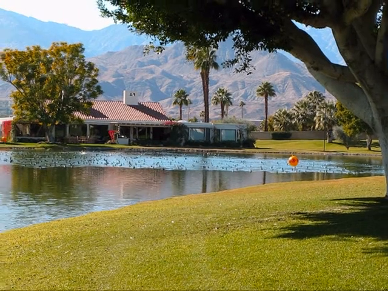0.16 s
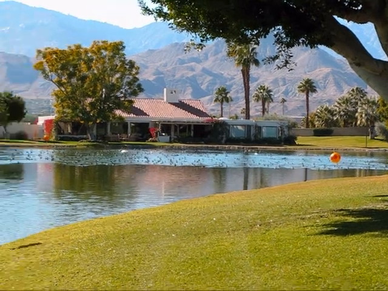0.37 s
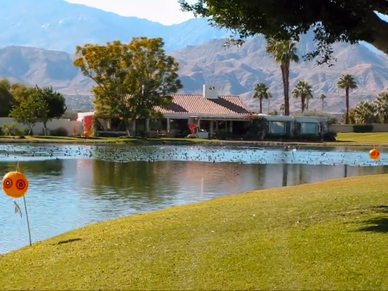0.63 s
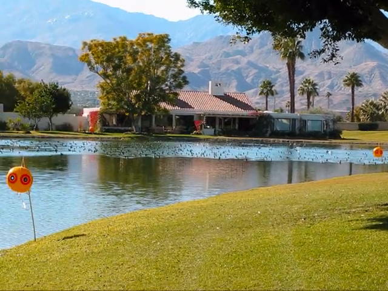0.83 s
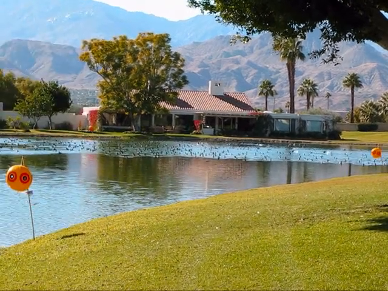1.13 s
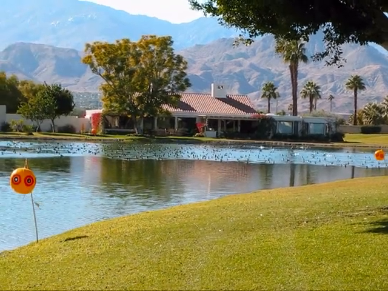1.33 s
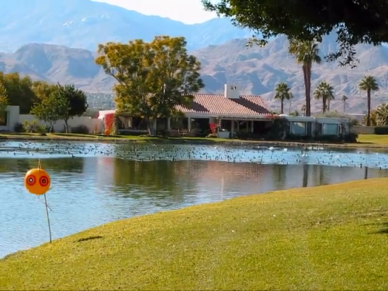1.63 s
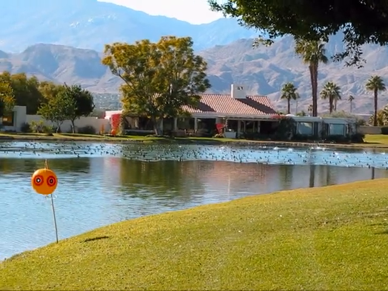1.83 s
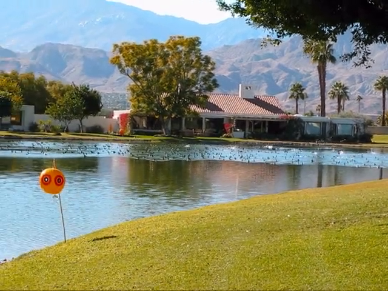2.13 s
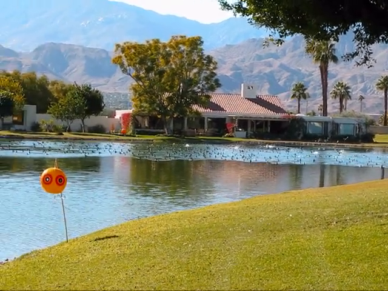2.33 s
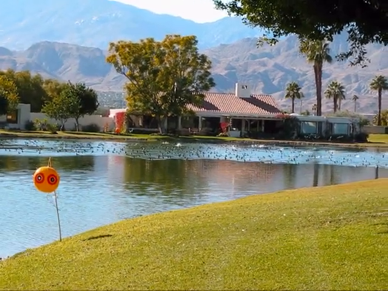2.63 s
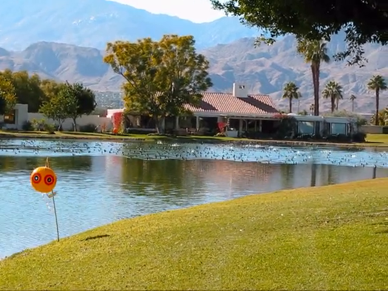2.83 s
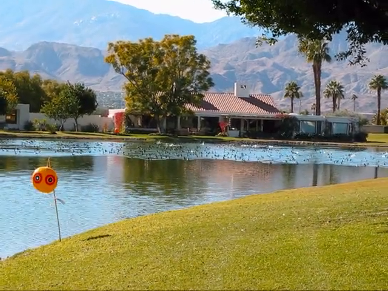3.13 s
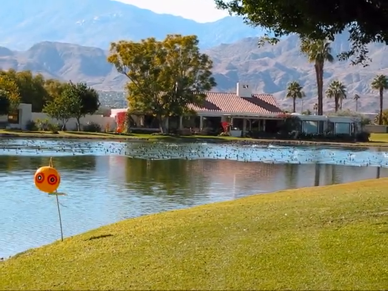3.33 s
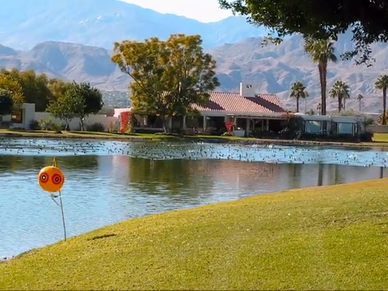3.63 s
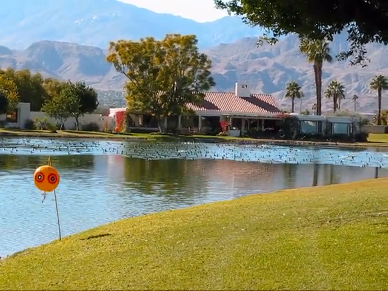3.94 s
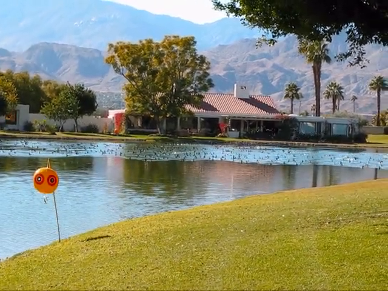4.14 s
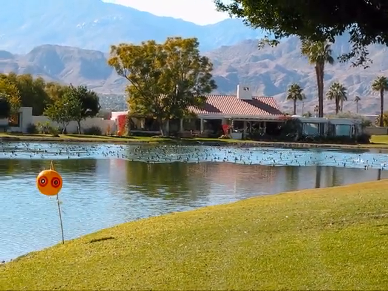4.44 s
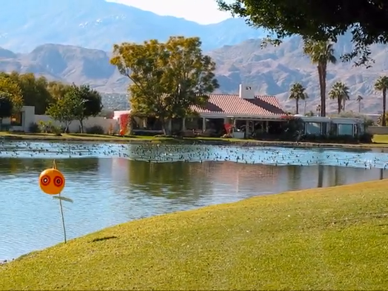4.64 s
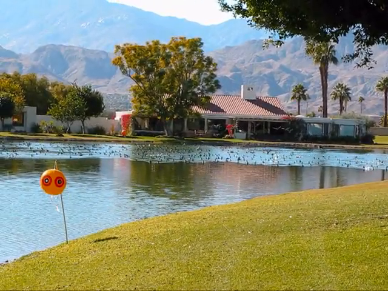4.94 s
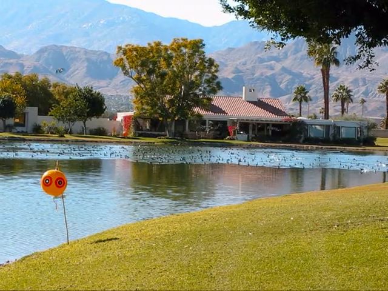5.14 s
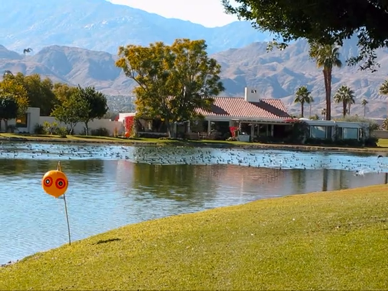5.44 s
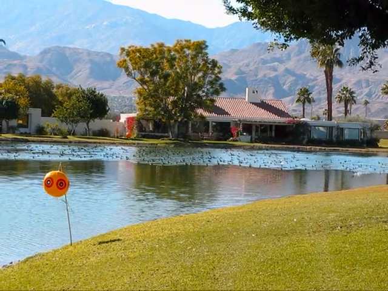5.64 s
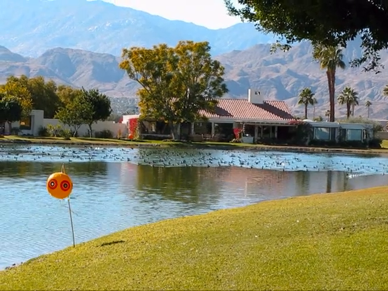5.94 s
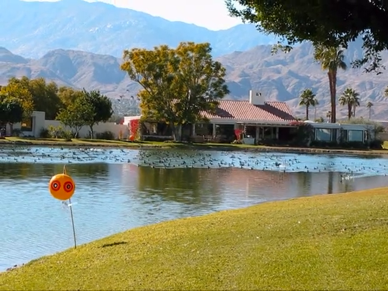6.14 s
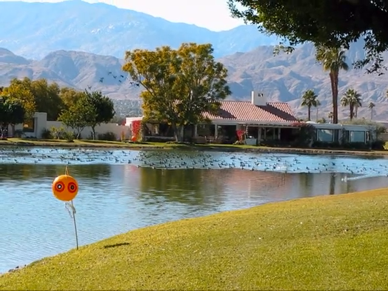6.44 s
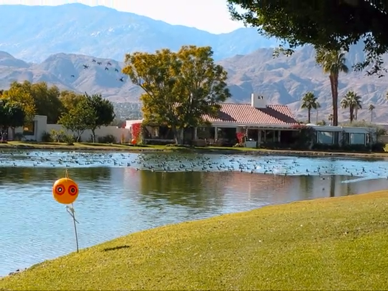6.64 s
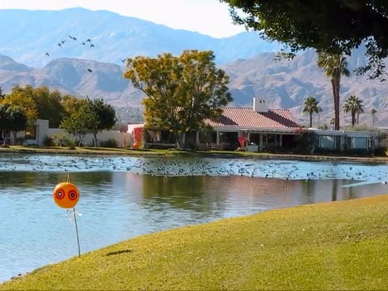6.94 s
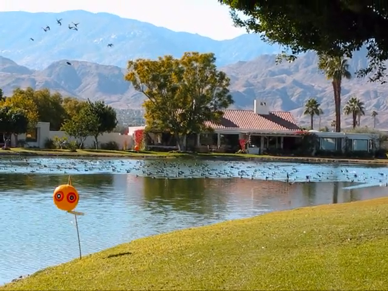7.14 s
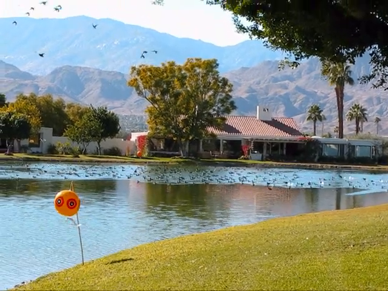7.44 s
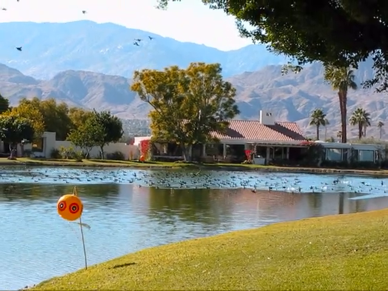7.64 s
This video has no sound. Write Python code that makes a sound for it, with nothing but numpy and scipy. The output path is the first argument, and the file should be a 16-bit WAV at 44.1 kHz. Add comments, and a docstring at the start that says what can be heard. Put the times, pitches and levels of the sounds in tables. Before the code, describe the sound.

Waterbirds rest far out on an open pond. Throughout the roughly eight seconds, their soft chatter, dabbling and tiny splashes mix with steady airy hiss and a distant motor's low, wavering hum. From the start until about 3.3 seconds, birds give a string of short two-toned notes. Hoarse clucks join from about 1.4 seconds, bunching up between 3 and 4 seconds. Light wind rumbles on the microphone from around 2 seconds, with the strongest bumps near 5.2 and 6.5 seconds. Two sharp little water ticks come near 3.8 seconds. From about 3.5 seconds, brief rising and falling whistles and fainter high squeals take over, clearest near 5.1 and 6.6 seconds. A second faint drone swells once between 4 and 5.5 seconds. From about 6.7 seconds to the end, a small bird peeps thinly. The calls carry a slight echo from the banks.

```python
"""Coots and other waterbirds rest far out on a pond. Throughout, chatter, dabbling and small splashes
mix with open-air hiss and a distant motor's hum. First come short two-toned notes, one tone from each
side of the syrinx; hoarse clucks, pulses ringing the throat, join them as light wind starts to bump the
one microphone. From about halfway, arched whistles and faint squeals, shaped by throat resonance, take
over and a second drone swells once. Near the end a small bird peeps thinly."""
import sys
import numpy as np
from scipy import signal
from scipy.fft import rfft, irfft, next_fast_len
from scipy.io import wavfile

SR = 44100
rng = np.random.default_rng(int(sys.argv[2]) if len(sys.argv) > 2 else 0)


def bounce(signal):
    """Save signal as a 16-bit WAV file at the path given by the first command-line argument."""
    frames = np.transpose(np.atleast_2d(signal))
    limited = np.clip(frames, -1, 1)
    pcm = np.round(limited * 32767).astype(np.int16)
    wavfile.write(sys.argv[1], SR, pcm)


N = 343098
TIME = np.arange(N) / SR

# spectra (f/Hz, relative spectral level/dB)
AIR_SPECTRUM = [(59, -26), (100, -3), (124, -3.5), (210, -8), (459, -9), (716, -8), (1380, -11),
                (2240, -13.5), (3730, -18), (9270, -24.5), (14500, -30.5), (15700, -33)]   # steady open air
WIND_SPECTRUM = [(25, -23), (50, -4.5), (90, 2), (150, -1.5), (230, -8), (350, -17), (700, -43),
                 (3000, -100)]   # turbulence at the microphone
CHATTER_SPECTRUM = [(300, -47), (480, 0.5), (650, 5), (900, 1), (1300, -2.5), (2000, -25)]   # low voices of the far flock
DABBLING_SPECTRUM = [(700, -8.5), (1300, -3.5), (1800, -1.5), (2300, -1), (3100, -3), (3900, -11.5),
                     (5000, -14.5), (9000, -45)]   # bills in the water
SPRAY_SPECTRUM = [(3000, 5), (5000, 3.5), (8000, -1), (12000, -7.5), (15800, -25)]   # fine spray
# swing of the motor's hum (t/s, relative level/dB)
HUM_LEVELS = [(0.0, -63), (0.41, -59.5), (0.78, -51.5), (1.99, -48), (2.3, -49.5), (2.93, -57.5),
              (3.58, -58.5), (3.86, -52.5), (4.38, -54), (4.53, -50), (5.87, -60), (6.44, -47.5),
              (6.82, -60), (7.3, -59), (7.78, -50)]
# its overtones at the usual hum level (frequency ratio, level/dB)
HUM_OVERTONES = [(1.48, -64), (2, -64.5), (3, -71.5)]
# gusts of the breeze (t/s, duration/s, relative level/dB)
WIND_GUSTS = [(1.29, .16, -62), (1.98, .13, -56), (2.186, 0.18, -47), (2.59, 0.25, -53), (3.59, 0.26, -46),
              (3.855, 0.5, -49), (4.398, 0.42, -47), (4.75, 0.32, -49.5), (5.15, .18, -43.5),
              (6.18, 0.17, -50.5), (6.434, 0.187, -43.5), (6.674, .12, -48), (6.968, 0.91, -51),
              (7.706, 0.12, -57)]
# the hardest eddies (t/s, duration/s, relative level/dB)
WIND_EDDIES = [(2.28, .036, -38), (2.619, .054, -37), (3.59, 0.053, -34.5), (3.705, 0.048, -31.5),
               (4.029, 0.046, -35), (5.086, .034, -32.5), (5.222, 0.041, -25), (5.268, .026, -26),
               (6.472, 0.0302, -29), (6.556, 0.054, -37)]
# how busy the far flock is (t/s, chatter activity/dB, dabbling activity/dB)
FLOCK_ACTIVITY = [(0.0, -51, -51), (0.73, -54, -50.5), (2.04, -49.5, -48.5), (2.6, -48.5, -48),
                  (3.14, -49.5, -47), (4.83, -50, -47), (6.09, -50.5, -49.5), (6.44, -49, -48.5),
                  (7.78, -49.5, -48.5)]
# reflections off the far bank (delay/s, gain/dB)
BANK_ECHOES = [(.047, -28), (.083, -30), (.135, -32)]
# splashes, and two faint, very high ticks of hiss at 13 and 14 kHz
# (t/s, level/dB, centre f/Hz, decay time/s)
SPLASHES_AND_TICKS = [(.307, -53, 13000, .015), (.395, -42, 2740, 0.047), (.411, -49, 6500, .014),
                      (.487, -49, 7000, .004), (.613, -48, 6800, .01), (.733, -49, 5400, 0.032),
                      (.871, -45, 6000, .007), (2.734, -50, 11000, .008), (3.364, -40, 10000, 0.0019),
                      (3.749, -29, 2000, .002), (3.814, -33, 2000, .002), (4.228, -46, 6000, .018),
                      (4.286, -35, 3000, .004), (5.475, -49, 5690, 0.061), (5.66, -54, 14000, .02),
                      (5.751, -43.5, 4530, .008), (5.806, -42.5, 5630, .02), (6.029, -38.5, 7150, .0021),
                      (6.547, -47, 7500, .006), (7.341, -48, 8500, .016), (7.59, -52, 11500, .03)]
# hoarse clucks (t/s, throat resonance f/Hz, level/dB)
CLUCK_CALLS = [(1.367, 990, -47), (1.7, 715, -50), (2.24, 830, -46.5), (2.395, 1530, -49),
               (2.572, 660, -49), (3.205, 600, -42.5), (3.37, 940, -45), (3.373, 1500, -47),
               (3.476, 2560, -43.5), (3.555, 2930, -50), (3.598, 2460, -47), (3.642, 1980, -41.5),
               (3.748, 1480, -43.5), (3.804, 1580, -45), (3.875, 1490, -44), (3.937, 1480, -43.5)]
# a small bird's peeps (t/s, f/Hz, level/dB)
PEEP_CALLS = [(6.722, 4960, -49.5), (6.842, 5950, -57), (6.85, 4900, -58), (6.946, 5980, -58),
              (6.958, 4620, -54), (7.06, 4940, -55), (7.17, 4650, -59), (7.398, 5800, -51),
              (7.515, 4850, -53), (7.625, 4890, -50), (7.74, 4860, -54)]
# transmission of throat and bill (f/Hz, gain/dB)
THROAT_RESPONSE = [(1200, -6), (1700, -6), (2150, 0), (2650, 0), (3350, -2), (3650, -10), (4100, -12)]
# two-toned notes (t/s of the top, upper tone's top f/Hz, level/dB)
NOTE_CALLS = [(.06, 2586, -49), (.185, 2544, -50), (.31, 2450, -56.5), (.6, 2385, -55), (0.754, 2420, -50),
              (.895, 2360, -50.5), (1.053, 2570, -53), (1.215, 2644, -46.5), (1.35, 2660, -52.5),
              (1.545, 2900, -54), (1.622, 2620, -53), (1.748, 2570, -46), (1.875, 2610, -47.5),
              (2.03, 2280, -51), (2.135, 2785, -50.5), (2.41, 3090, -52), (3.09, 2805, -46.5),
              (3.34, 2775, -48.5)]
# squeals, mostly over a whistle from the syrinx's other side
# (t/s of the top, duration/s, top f/Hz, relative level/dB)
SQUEAL_CALLS = [(3.666, .07, 3070, -50), (3.918, 0.065, 3280, -56), (4.144, .06, 3100, -51),
                (4.414, 0.11, 3500, -48), (4.457, .097, 3720, -51), (4.663, 0.14, 3500, -49.5),
                (4.867, 0.13, 3350, -55.5), (5.097, 0.072, 4050, -44), (5.311, .135, 3550, -50),
                (5.582, .14, 4130, -48.5), (5.847, .15, 3720, -50.5), (6.371, 0.16, 4160, -48.5),
                (6.608, 0.073, 2920, -46.5), (7.29, .135, 3490, -48.5)]
# nearer birds' whistles (t/s of the top, duration/s, top f/Hz, share the ends lie lower, level/dB)
WHISTLE_CALLS = [(2.409, 0.087, 1574, .2, -51), (3.334, 0.046, 2190, .06, -46),
                 (3.843, .065, 2270, .05, -40), (3.879, .04, 2020, .07, -44.5),
                 (4.08, .085, 2640, .24, -43.5), (4.362, .058, 2360, .16, -42.5),
                 (4.665, .033, 1950, .05, -46), (4.728, .036, 2167, .06, -41),
                 (4.824, .096, 2440, .22, -39.5), (4.845, .053, 2180, .12, -42),
                 (5.095, .07, 2660, .2, -38), (5.097, .045, 2030, .08, -37), (5.305, .028, 2090, .07, -47),
                 (5.589, 0.073, 2196, .16, -42.5), (5.838, .07, 2394, .14, -44),
                 (6.355, .036, 2440, .1, -44.5), (6.387, 0.0497, 2235, .04, -41.5),
                 (6.645, .078, 2205, .035, -34), (7.295, .04, 2126, .07, -41),
                 (7.548, .083, 2295, .12, -43)]


def from_db(db):
    """Amplitude ratio of a level: 20 dB to a factor of ten."""
    return 10 ** (np.asarray(db) / 20)


def rms_one(x):
    """Normalisation to unit mean power."""
    return x / np.sqrt(np.mean(x ** 2) + 1e-20)


def in_time(rows):
    """Linear interpolation of each column over time."""
    s, *columns = np.transpose(rows)
    return [np.interp(TIME, s, c) for c in columns]


def at_hz(points, hz):
    """Interpolation of a spectrum on a log-frequency axis."""
    known_hz, db = np.transpose(points)
    return np.interp(np.log(hz + 1e-9), np.log(known_hz), db)


def drift(rate, size=N):
    """Random modulation: straight lines join Gaussian values, rate of them a second."""
    knots = np.arange(size) * rate / SR
    return np.interp(knots, np.arange(size // 20 + 2), rng.standard_normal(size // 20 + 2))


def noise(spectrum):
    """Spectral shaping of white noise, falling steeply below the lowest point; rms 1."""
    size = next_fast_len(N)
    hz = np.arange(size // 2 + 1) * SR / size
    gain = from_db(at_hz(spectrum, hz)) * np.minimum(hz / spectrum[0][0], 1) ** 2
    return rms_one(irfft(rfft(rng.standard_normal(size)) * gain, size)[:N])


def band(x, hz, octaves):
    """Band-pass filtering about a centre frequency; rms 1."""
    edges = np.minimum(hz * 2 ** (np.array([-.5, .5]) * octaves), [.4 * SR, .45 * SR])
    return rms_one(signal.sosfilt(signal.butter(2, edges, "band", fs=SR, output="sos"), x))


def swell(length, power):
    """Time axis and an envelope, a half sine raised to a power."""
    t = np.arange(int(length * SR)) / SR
    return t, np.abs(np.sin(np.pi * t / length)) ** power


def tone(hz):
    """A sinusoid whose phase is the integral of frequency; rms 1."""
    return np.sqrt(2) * np.sin(2 * np.pi * (np.cumsum(hz) / SR + rng.random()))


def add(out, s, sound):
    """Superposition of a sound starting at time s."""
    at = max(int(s * SR), 0)
    out[at:at + len(sound)] += sound[:max(N - at, 0)]


def open_air(level_db=-47.5):
    """Stationary broadband noise forms the ambient floor."""
    return from_db(level_db) * noise(AIR_SPECTRUM)


def motor(hum_hz=122.54, wander=0.0065, waver_db=1.5, fading_db=5.0, follow_share=0.16):
    """Periodic vibration gives a far hum, whose overtones fade in and out along the path."""
    hum_db, = in_time(HUM_LEVELS)
    hz = hum_hz * (1 + wander * drift(5))
    out = from_db(hum_db + 1 + waver_db * drift(9)) * tone(hz)
    swing_db = follow_share * (hum_db - hum_db.mean())
    for ratio, db in HUM_OVERTONES:
        out += from_db(db + swing_db + fading_db * drift(3)) * tone(ratio * hz)
    return out


def drone(start_s=3.95, length_s=1.56, level_db=-58.5, waver_db=1.5, start_hz=264, climb_hz_per_s=12):
    """A weak tone above the hum swells once in a slow linear frequency sweep."""
    out = np.zeros(N)
    t, envelope = swell(length_s, power=0.37)
    gain = from_db(level_db + waver_db * drift(8.5)[:len(t)])
    add(out, start_s, gain * envelope * tone(start_hz + climb_hz_per_s * t))
    return out


def wind(rumble_gain_db=3.5, calm_db=-64, lumps_db=2.5, eddy_gain_db=-4.5, eddy_cycles=4.47):
    """Turbulent pressure rumbles with each gust; strong eddies push the diaphragm for a few cycles."""
    gusts = np.zeros(N)
    for s, length, db in WIND_GUSTS:
        add(gusts, s, from_db(db) * swell(length, power=0.57)[1])
    flow = np.hypot(from_db(calm_db), gusts)
    out = noise(WIND_SPECTRUM) * flow * from_db(rumble_gain_db + lumps_db * drift(35))
    turbulence = noise(WIND_SPECTRUM)
    for s, length, db in WIND_EDDIES:
        t, envelope = swell(length, power=1.44)
        push = tone(np.full(len(t), eddy_cycles / length)) + turbulence[int(s * SR):][:len(t)]
        add(out, s, from_db(db + eddy_gain_db) * envelope * rms_one(push))
    return out


def plops(spectrum, per_s, cycles, size_db, resonators=24):
    """Random impulses ring damped resonators, which decay by 60 dB in the given cycles; rms 1."""
    out = np.zeros(N)
    count = int(np.clip(per_s * N / SR / resonators, 1, 400))
    for hz in np.geomspace(spectrum[0][0], spectrum[-1][0], resonators):
        when, size, sign = rng.random((3, 400))[:, :count]
        strength = from_db(size_db * np.minimum(-np.log(size), np.pi))
        clicks = np.full(N, 1e-18)
        clicks[(when * N).astype(int)] = strength * np.sign(sign - .5)
        radius, angle = np.exp(-np.log(1000) * hz / (cycles * SR)), 2 * np.pi * hz / SR
        rings = signal.lfilter([1, 0, -1], [1, -2 * radius * np.cos(angle), radius ** 2], clicks)
        out += rms_one(rings) * from_db(at_hz(spectrum, hz)) * np.sqrt(hz)
    return rms_one(out)


def activity_gain(db, expansion):
    """Dynamic expansion: the din sinks steeply as the flock grows less busy."""
    return from_db(db.max() + expansion * (db - db.max()))


def flock_din(chatter_gain_db=-2, spray_end_db=-54, spray_growth_db_per_s=3):
    """Far chatter, dabbling bills and growing spray sum incoherently to a grainy wash."""
    chatter_db, dabbling_db = in_time(FLOCK_ACTIVITY)
    chatter = noise(CHATTER_SPECTRUM) + 1.07 * plops(CHATTER_SPECTRUM, 160, cycles=36, size_db=2.5)
    dabbling = noise(DABBLING_SPECTRUM) + 0.59 * plops(DABBLING_SPECTRUM, 500, cycles=17, size_db=1.0)
    spray_db = spray_end_db - spray_growth_db_per_s * (TIME[-1] - TIME)
    return (rms_one(chatter) * activity_gain(chatter_db + chatter_gain_db, expansion=3.4)
            + rms_one(dabbling) * activity_gain(dabbling_db, expansion=2.4)
            + noise(SPRAY_SPECTRUM) * from_db(spray_db))


def bank_reflections(x, tail_db=-17, t60=0.29):
    """Reflection from banks and trees adds a few echoes and a thin diffuse tail."""
    t = np.arange(SR) / SR
    tail = rng.standard_normal(SR) * np.exp(-np.log(1000) * t / t60)
    response = from_db(tail_db) * tail / np.linalg.norm(tail)
    for delay, db in BANK_ECHOES:
        response[int(delay * SR)] += from_db(db)
    return x + signal.fftconvolve(x, response)[:N]


def scatter(sound, db, smear_s):
    """Multipath propagation over water and grass smears each call in its own way."""
    t = np.arange(SR // 10) / SR
    paths = rng.standard_normal(len(t)) * np.exp(-t / smear_s)
    smeared = signal.fftconvolve(sound, paths)
    out = smeared * from_db(db) * np.linalg.norm(sound) / np.linalg.norm(smeared)
    out[:len(sound)] += sound
    return out / np.hypot(1, from_db(db))


def splashes_and_ticks(attack_share=0.19, flick_count=5, flick_db=-55, flick_hz=8000, flick_decay_s=.008):
    """Exponentially decaying noise bursts: splashes, random flicks of water, two faint ticks of hiss."""
    out, t = np.zeros(N), np.arange(SR // 5) / SR
    flicks = [(when * N / SR, flick_db, flick_hz * 2 ** (pitch - .5), flick_decay_s)
              for when, pitch in rng.random((flick_count, 2))]
    for s, db, hz, decay in SPLASHES_AND_TICKS + flicks:
        envelope = (1 - np.exp(-t / (attack_share * decay))) * np.exp(-t / decay)
        add(out, s, from_db(db) * envelope * band(rng.standard_normal(len(t)), hz, octaves=0.95))
    return out


def far_whistles(count=44, level_db=-59, spread_db=7.5, low_hz=1900, high_hz=2700, sag=0.155):
    """Birds farther out give faint arches of frequency modulation at random times."""
    out, jitter = np.zeros(N), 0.019 * drift(700)
    for when, pitch, size in rng.random((count, 3)):
        t, envelope = swell(0.0441 + 0.059 * size, power=1)
        hz = low_hz * (high_hz / low_hz) ** pitch * (1 - sag * (1 - envelope))
        hz *= 1 + np.resize(jitter[int(when * N):], len(t))
        add(out, when * N / SR, from_db(level_db + spread_db * size) * envelope * tone(hz))
    return out


def peeps(length_s=0.03, jitter=0.017, flutter_db=2.0):
    """Random frequency and amplitude modulation makes a small bird's high, level notes scratchy."""
    out = np.zeros(N)
    t, envelope = swell(length_s, power=0.64)
    for s, hz, db in PEEP_CALLS:
        voice = tone(hz * (1 + jitter * drift(1100, size=len(t))))
        voice *= from_db(flutter_db * drift(320, size=len(t)))
        add(out, s, scatter(from_db(db) * envelope * rms_one(voice), db=-6, smear_s=0.017))
    return out


def clucks(pulse_hz=190, rasp=0.94, length_at_1khz_s=0.025):
    """Source and filter: a few rough pulses ring one throat resonance; low clucks last longest."""
    out, breath = np.zeros(N), rng.standard_normal(N)
    for s, hz, db in CLUCK_CALLS:
        t, envelope = swell(length_at_1khz_s * (1000 / hz) ** 0.32, power=0.67)
        pulses = rms_one(np.diff(np.floor(t * pulse_hz), prepend=-1))
        source = pulses + rasp * breath[int(s * SR):][:len(t)]
        add(out, s, from_db(db) * envelope * band(source, hz, octaves=0.27))
    return out


def arched_tone(top_s, length, top_hz, end_hz, db, rise_share, smear_s):
    """A syrinx tone sweeps up and down through the throat resonance. Gives (start t/s, sound)."""
    t, envelope = swell(length, power=.4)
    rise = length * rise_share
    from_top = np.abs(t - rise) / np.where(t < rise, rise, length - rise)
    hz = top_hz + (end_hz - top_hz) * from_top ** 1.35   # power 1 is a pointed top, 2 a round one
    envelope *= from_db(at_hz(THROAT_RESPONSE, hz))
    weakness_db = -36 - db   # weak calls are the hoarsest and most smeared
    hoarseness = 2 ** (weakness_db / 15)
    hz *= 1 + 0.013 * hoarseness * drift(591, size=SR // 4)[:len(t)]
    voice = tone(hz) + from_db(-27) * tone(2 * hz)
    flutter_db = 2.5 * hoarseness * drift(172, size=SR // 4)[:len(t)]
    call = from_db(db) * envelope / envelope.max() * rms_one(voice * from_db(flutter_db))
    return top_s - rise, scatter(call, weakness_db - 15, smear_s)


def two_toned_notes(length_s=.082, usual_hz=2546, lower_ratio=.815, lower_db=-4.5, lower_lag_s=.006):
    """Biphonation: the two sides of the syrinx sound short arches about a third apart."""
    out = np.zeros(N)
    for s, hz, db in NOTE_CALLS:
        end_hz = hz * (1 - 0.0523 * (hz / usual_hz) ** 6)   # higher notes arch far more
        for lag_s, ratio, gain_db in (0, 1, 0), (lower_lag_s, lower_ratio, lower_db):
            add(out, *arched_tone(s + lag_s, length_s, hz * ratio, end_hz * ratio, db + gain_db,
                                  rise_share=.5, smear_s=0.017))
    return out


def squeals(rest_hz=2450, gain_db=-1.0):
    """Sweeps up from rest and back; the highest leave the throat's passband and nearly break off."""
    out = np.zeros(N)
    for s, length, hz, db in SQUEAL_CALLS:
        add(out, *arched_tone(s, length, hz, rest_hz, db + gain_db, rise_share=.49, smear_s=0.0059))
    return out


def whistles():
    """Frequency modulation of a nearly pure tone: each whistle climbs, then sinks more slowly."""
    out = np.zeros(N)
    for s, length, hz, sag, db in WHISTLE_CALLS:
        add(out, *arched_tone(s, length, hz, hz * (1 - sag), db, rise_share=.39, smear_s=0.0096))
    return out


def scene():
    """Superposition of birds, water, air, hum and wind at one microphone; both channels alike."""
    calls = whistles() + squeals() + two_toned_notes() + far_whistles() + peeps() + clucks()
    pond = bank_reflections(calls + splashes_and_ticks())
    mono = pond + flock_din() + open_air() + motor() + drone() + wind()
    return np.array([mono, mono])


def record(dry):
    """Band limiting: an elliptic low-pass cuts steeply above 15750 Hz."""
    return signal.sosfilt(signal.ellip(12, .1, 80, 15750, fs=SR, output="sos"), dry)


dry = scene()
out = record(dry)
bounce(out)
```